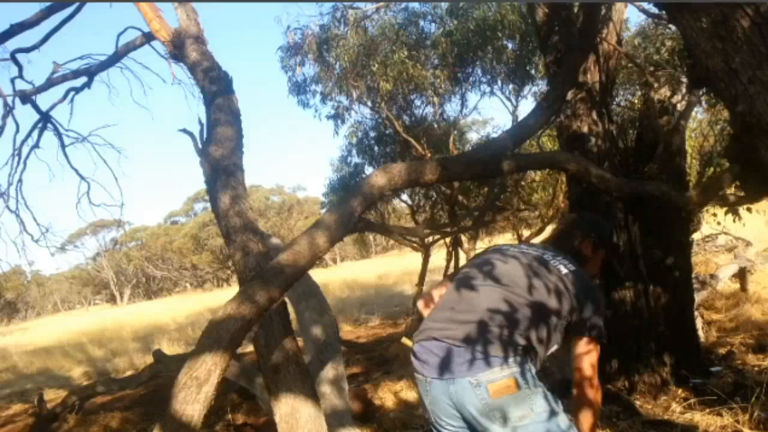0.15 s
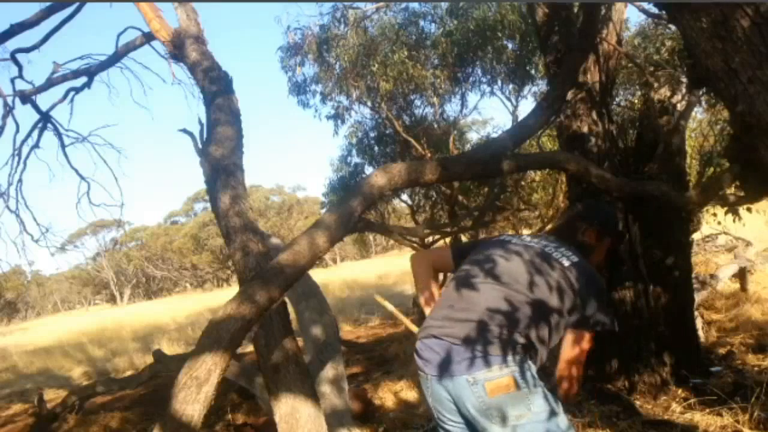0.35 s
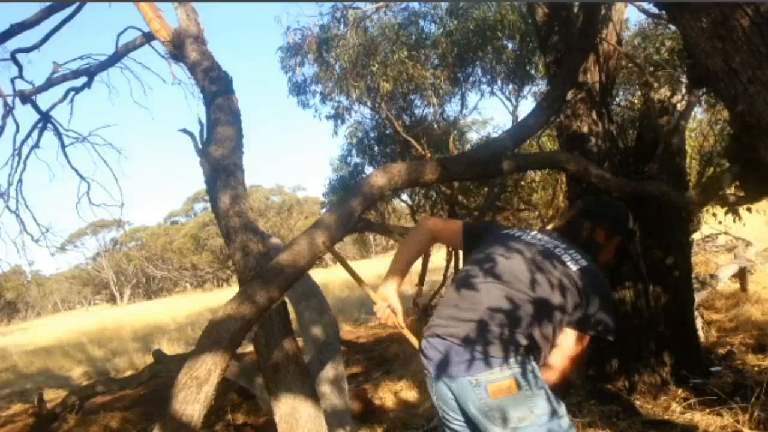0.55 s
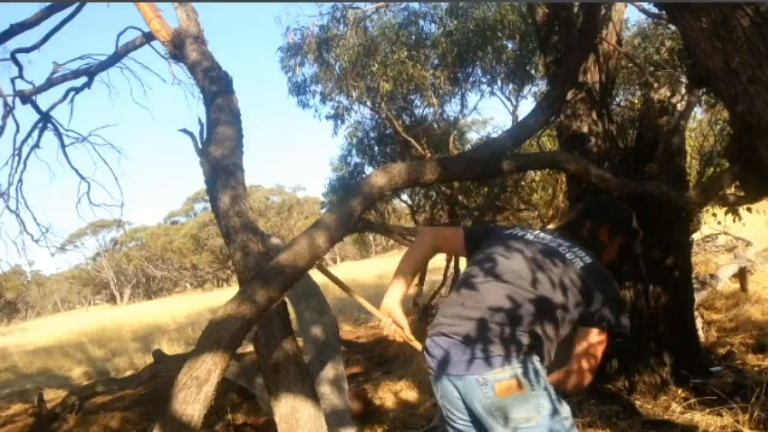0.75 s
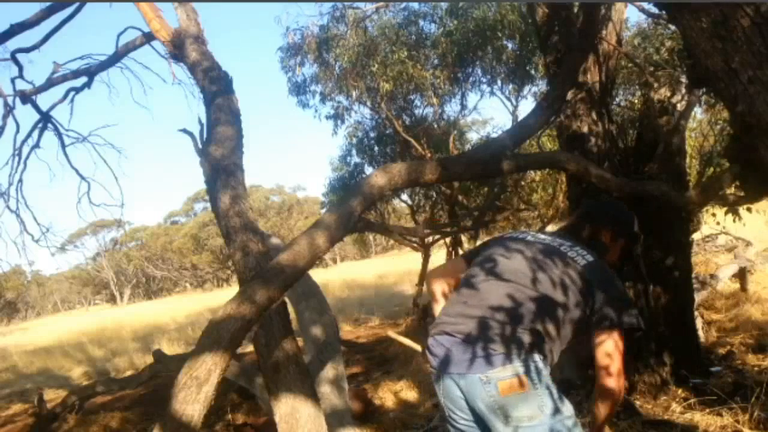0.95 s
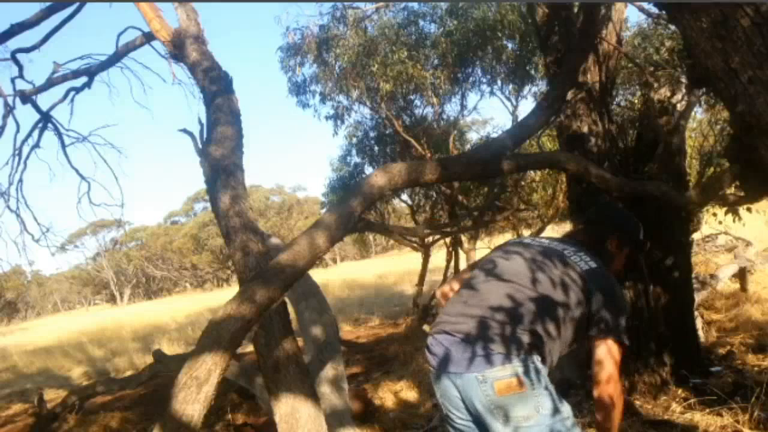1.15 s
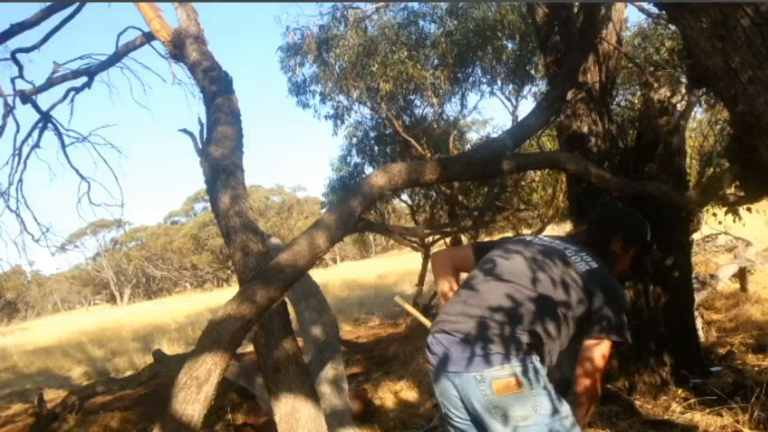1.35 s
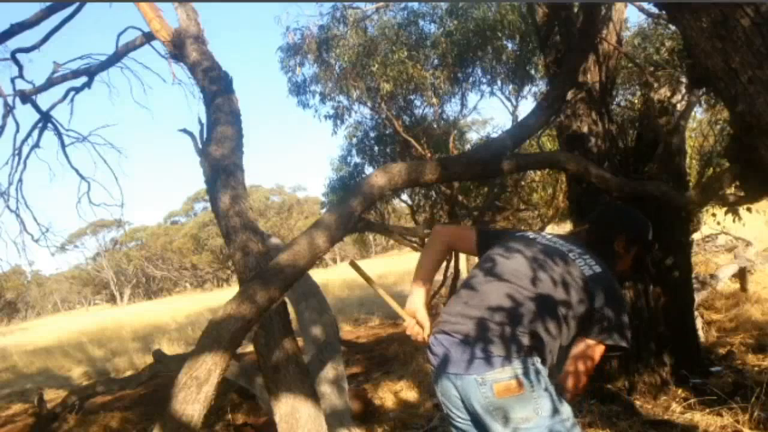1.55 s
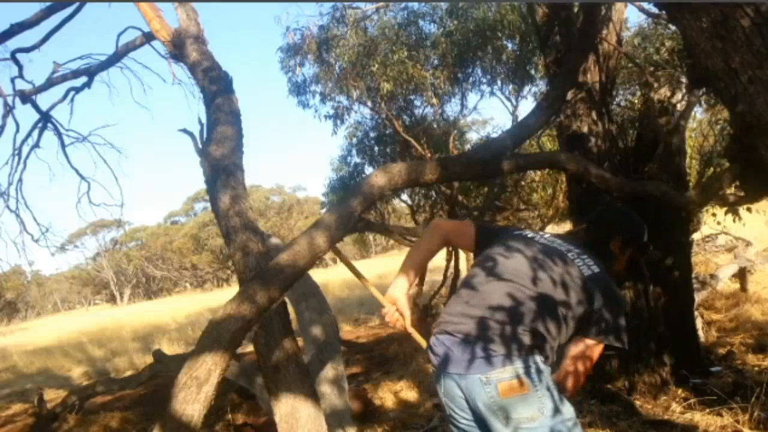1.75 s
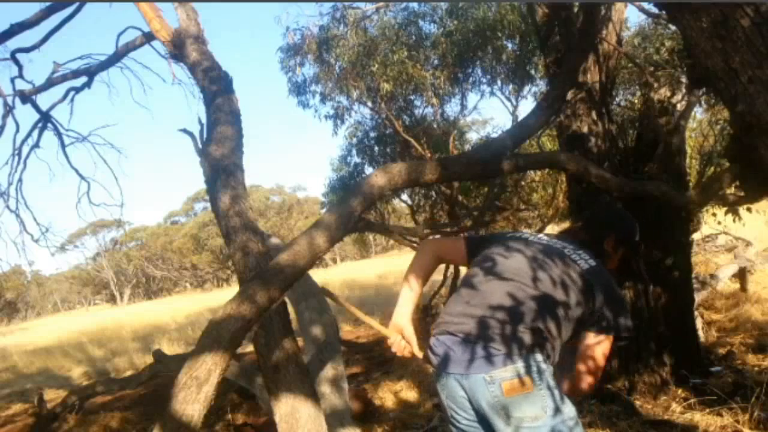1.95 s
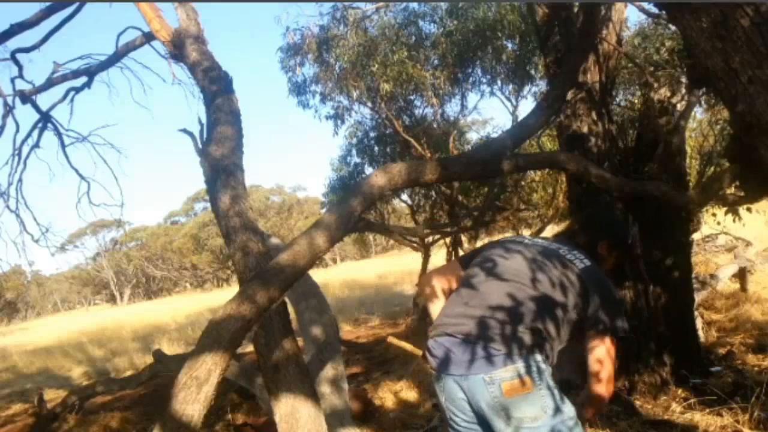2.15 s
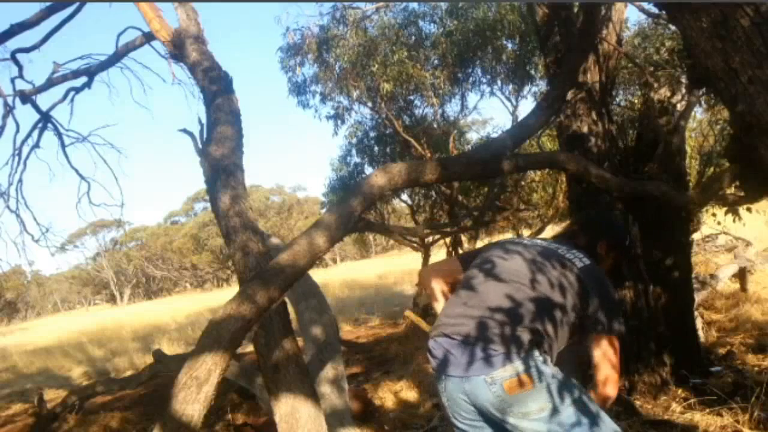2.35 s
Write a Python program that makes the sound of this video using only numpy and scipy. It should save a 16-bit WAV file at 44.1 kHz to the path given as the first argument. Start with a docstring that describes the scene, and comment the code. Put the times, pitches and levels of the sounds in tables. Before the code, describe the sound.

A rake works dry leaves and soil outdoors. Soft rustle and tiny ticks open; at about 0.27 s hard knocks land, then another clack at 0.44 s leads a gritty scrape fading by 0.75 s. Sparse twig ticks fill the lull. At 1.33-1.5 s a second stroke knocks twice, ringing briefly, with softer scraping and a faint squeak near 1.6 s, fading to quiet air and slight rustle at the end.

```python
"""Dry leaves rustle softly and grit scrapes as a long-handled rake is dragged twice through leaves and soil
outdoors. Scattered clicks make the leaves and the soil; grains ringing the rake, plus hiss, make the grit.
Small twigs and pebbles tick as short tones, and twice a dry leaf snaps high up. The rake head knocks on buried
wood and stones and rings briefly, as a set of dying tones, and squeaks now and then on gliding tones. A short
scatter follows these hits. Shaped noise makes the faint open air and a faint low noise."""
import sys
import numpy as np
from scipy import signal
from scipy.fft import rfft, irfft
from scipy.io import wavfile
from scipy.ndimage import uniform_filter1d

SR = 44100
rng = np.random.default_rng(int(sys.argv[2]) if len(sys.argv) > 2 else 0)


def elevation(decibels):
    """Turn decibel levels (scalar or array-like) into linear amplitude ratios."""
    levels = np.asarray(decibels, float)
    return 10 ** (levels / 20)


def output_pcm(signal):
    """Save a mono or channel-first signal as 16-bit PCM at the path in sys.argv[1].

    Samples are clipped to [-1, 1] before scaling.
    """
    pcm = np.clip(np.atleast_2d(signal).T, -1, 1) * 32767
    wavfile.write(sys.argv[1], SR, np.round(pcm).astype(np.int16))


N = 110250  # samples, 2.5 s

# The tones at which the rake head likes to ring. Each row: pitch in Hz.
MODE_HZ = [530, 690, 780, 880, 1175, 1350, 1450, 1585, 1700, 1950, 2075, 2460, 2660, 2880, 3330, 3770, 4850,
           5900]
# How those tones behave, in the same order; knocks and grit each adapt these values.
# Each row: basic strength in dB, basic time to fade by 60 dB in seconds.
MODE_RING = [(-1.5, 0.063), (3.5, 0.03), (6.5, 0.021), (-3.5, 0.019), (-10.5, 0.11), (-8, 0.062),
             (15, 0.023), (8, 0.053), (15.5, 0.019), (2, 0.038), (-0.5, 0.076), (5.5, 0.034), (-1.5, 0.055),
             (-0.5, 0.065), (3.5, 0.082), (7, 0.026), (11, 0.021), (13.5, 0.0059)]


def evened(x):
    """Scales a sound to an rms of 1."""
    return x / np.sqrt(np.mean(x ** 2) + 1e-20)


def add(mix, s, sound):
    """Mixes a sound in at time s, in seconds."""
    part = mix[round(s * SR):][:len(sound)]
    part += sound[:len(part)]


def colour(x, points):
    """Reshapes the balance of pitches in x to (Hz, dB) points, with -70 dB outside them, at rms 1."""
    hz, db = np.transpose(points)
    f = np.fft.rfftfreq(len(x), 1 / SR) + 1  # the 1 avoids log(0)
    gain = elevation(np.interp(np.log(f), np.log(hz), db, -70, -70))
    return evened(irfft(rfft(x) * gain, len(x)))


def clicks(per_s, spread_db):
    """Sparse single-sample clicks of random sign; a few are large."""
    present = rng.random(N) < per_s / SR
    sign = rng.choice([-1., 1.], N)
    size = elevation(spread_db * np.minimum(rng.exponential(1, N), 4))
    return present * sign * size


def level(column):
    """Loudness along the drag for one of its three materials."""
    # How strongly the rake stirs each material, before the low cut.
    # Each row: time in seconds, grit on the tines in dB, leaf rustle in dB, soil in dB.
    drag = np.array([(0, -51, -48.5, -63), (.12, -51, -44, -52.5), (.19, -50, -49.5, -54.5),
                     (.21, -54, -49, -59), (0.225, -36, -36, -44), (0.256, -38, -32.5, -40),
                     (0.289, -36.5, -43, -31), (0.338, -47.5, -50.5, -52.5), (0.393, -54, -50, -51),
                     (0.417, -34, -47, -35.5), (.455, -26, -37, -49), (.49, -31, -36.5, -47),
                     (.56, -33.5, -34.5, -43.5), (.66, -39.5, -37.5, -46), (0.719, -41.5, -44, -52.5),
                     (.77, -49.5, -51.5, -55.5), (.93, -50, -51, -57.5), (.97, -50.5, -47, -58),
                     (1.13, -48, -45, -56.5), (1.2, -57.5, -52, -58.5), (1.26, -47.5, -48.5, -58),
                     (1.315, -56, -56, -56), (1.325, -46, -47, -40), (1.338, -40, -46, -91),
                     (1.363, -39, -39.5, -35), (1.42, -41, -42.5, -47.5), (1.46, -43.5, -43, -46),
                     (1.5, -41, -42, -43.5), (1.568, -44, -47, -54), (1.69, -42.5, -40, -51),
                     (1.77, -47, -47, -56), (1.87, -46.5, -50.5, -59), (1.92, -55, -56.5, -63),
                     (2.1, -57, -64.5, -55), (2.2, -60.5, -66.5, -64.5), (2.443, -58.5, -55, -60.5),
                     (2.5, -44.5, -40.5, -53)])
    return elevation(np.interp(np.arange(N) / SR, drag[:, 0], drag[:, column]))


def ring(hz, db, t60):
    """One tone that dies by 60 dB in t60 seconds, with a soft start."""
    TOUCH_S = .00015  # time constant of the soft start
    t = np.arange(6000) / SR
    fade = elevation(db - 60 * t / t60)
    return fade * np.sin(2 * np.pi * hz * t) * (1 - np.exp(-t / TOUCH_S))


def leaves():
    """Dense fine crackle of dry leaves: many tiny clicks, heard in the treble."""
    # Tone of the leaf crackle. Each row: frequency in Hz, strength in dB per Hz.
    leaf_tone = [(1500, -2.5), (4000, 0), (6000, -9.5), (7500, -5.5), (10000, -4), (13000, -3.5),
                 (14600, -7), (14900, -67)]
    return level(column=2) * colour(clicks(per_s=5000, spread_db=2.5), leaf_tone)


def grit():
    """Grains of soil each strike one dying rake tone, over a sandy hiss; both come in lumps."""
    LOW_HZ, LOW_DB = 1000, -9  # rake tones under LOW_HZ are weakened by LOW_DB
    RING_SHARE = .33  # share of the basic fade time
    HISS_DB, LUMP_DB = -2, 1.8  # hiss against the ringing; rms swing of the lumps
    # Tone of the sandy hiss. Each row: frequency in Hz, strength in dB per Hz.
    sand_tone = [(120, -59), (200, -27), (258, -35.5), (630, -2.5), (774, -23), (1690, -0.5), (2600, -1),
                 (2810, 0), (5410, -7.5), (9000, -37), (11700, -48), (19800, -120)]
    hits = clicks(per_s=4500, spread_db=3.2)
    mode = rng.integers(0, len(MODE_RING), N)  # which tone each grain strikes
    rung = np.zeros(N)
    for k, (hz, (db, t60)) in enumerate(zip(MODE_HZ, MODE_RING)):
        tone = ring(hz, db / 2 + LOW_DB * (hz < LOW_HZ), t60 * RING_SHARE)
        rung += signal.oaconvolve(hits * (mode == k), tone)[:N]
    drift = uniform_filter1d(uniform_filter1d(rng.standard_normal(N), size=250), size=250)
    lumps = elevation(LUMP_DB * evened(drift))
    hiss = elevation(HISS_DB) * colour(rng.standard_normal(N), sand_tone)
    return level(column=1) * evened(lumps) * evened(evened(rung) + hiss)


def soil():
    """Dull lumps of earth shifting: clicks with most of their strength low down."""
    # Tone of the soil. Each row: frequency in Hz, strength in dB per Hz.
    soil_tone = [(60, -47), (150, -13), (280, 7.5), (500, 0), (900, 1.5), (1400, -5.5)]
    return level(column=3) * colour(clicks(per_s=2000, spread_db=2.5), soil_tone)


def open_air():
    """Steady, faint outdoor background of shaped noise."""
    # Tone of the open air. Each row: frequency in Hz, strength in dB per Hz.
    air_tone = [(150, -24), (300, 1), (630, 1), (1700, -27), (3500, -41), (6200, -9.5), (9000, -3),
                (14600, -3), (14900, -73)]
    return elevation(-62) * colour(rng.standard_normal(N), air_tone)


def low_noise():
    """Faint low noise on a moving level."""
    # Loudness of the low noise. Each row: time in seconds, level in dB.
    low_level = [(0.0, -71.5), (0.22, -69.5), (0.28, -49.5), (0.35, -75), (0.46, -53), (0.49, -80),
                 (0.51, -57), (0.66, -91), (0.81, -68), (1.07, -70.5), (1.09, -79), (1.49, -52.5),
                 (1.59, -78), (1.89, -67.5), (2.43, -67.5), (2.5, -73)]
    # Tone of the low noise. Each row: frequency in Hz, strength in dB per Hz.
    low_tone = [(20, -12), (60, -16.5), (130, -11), (210, -5.5), (300, -5)]
    s, db = np.transpose(low_level)
    return elevation(np.interp(np.arange(N) / SR, s, db)) * colour(rng.standard_normal(N), low_tone)


def ticks():
    """Twigs and pebbles tick, and twice a dry leaf snaps high in the treble: two short dying tones and a dry
    snap at the start."""
    # The ticks; rows close in time build one broader click.
    # Each row: start in seconds, level of the main tone in dB, its pitch in Hz, its 60 dB fade in seconds.
    tick_rows = [(.095, -39, 2470, .012), (.116, -27.5, 2600, 0.0042), (0.128, -36, 2760, 0.031),
                 (.159, -28, 2060, 0.0059), (.7958, -32, 2430, 0.0085), (.8315, -36, 3270, 0.0022),
                 (.8315, -31, 770, 0.0069), (.832, -31.5, 368, 0.02), (.877, -39, 880, 0.017),
                 (.881, -37.5, 350, 0.026), (0.899, -42, 2500, 0.04), (0.916, -38, 3320, 0.016),
                 (0.967, -21.5, 9900, 0.0014), (1.251, -37, 2930, 0.0096), (1.262, -23.5, 2700, 0.0029),
                 (1.284, -41, 2120, 0.011), (1.41, -15, 10400, 0.0017), (1.506, -41, 1580, 0.0098),
                 (1.636, -32.5, 3270, 0.027), (1.65, -38, 1860, 0.022), (1.686, -32, 3100, 0.025),
                 (1.695, -30.5, 625, 0.024), (1.711, -37, 1854, 0.1), (1.968, -49, 2560, 0.13),
                 (2.053, -48, 653, 0.086), (2.097, -36.5, 1540, 0.0048), (2.285, -47, 3660, 0.014),
                 (2.372, -43, 1740, 0.014), (2.405, -38.5, 3500, 0.011)]
    hits = np.zeros(N)
    for s, db, hz, t60 in tick_rows:
        overtone = ring(hz * 1.45, db - 12, t60 * .7)
        snap = ring(2500, db - 2, .0015)
        add(hits, s, ring(hz, db, t60) + overtone + snap)
    return hits


def knock(level_db, favour_hz, share, crack_db, noise):
    """A short chatter of contact excites the rake tones near the favoured pitch, with a dry crack."""
    FAVOUR_DB_PER_OCT = -19  # loss for each octave away from the favoured pitch
    CHATTER_S, CHATTER = .003, .045  # fade time constant; strength against the first touch
    CRACK_S = .002  # time at which the crack's swell peaks
    t = np.arange(len(noise)) / SR
    body = 0
    for k, (hz, (db, t60)) in enumerate(zip(MODE_HZ, MODE_RING)):
        octaves = abs(np.log2(hz / favour_hz))
        body = body + (-1) ** k * ring(hz, db + FAVOUR_DB_PER_OCT * octaves, t60 * share)
    contact = noise * np.exp(-t / CHATTER_S) * CHATTER
    contact[0] = 1  # the first touch
    sound = signal.oaconvolve(body / abs(body).max(), contact / np.linalg.norm(contact))[:len(body)]
    crack_swell = np.e * t / CRACK_S * np.exp(-t / CRACK_S)
    sound[:len(t)] += elevation(crack_db) * uniform_filter1d(noise[::-1], size=4) * crack_swell
    return elevation(level_db) * sound


def knocks():
    """The rake head knocks on buried wood and stones; every row has its own contact noise."""
    # The knocks: blows, their bounces and extra rings; several rows may build one blow.
    # Each row: start in seconds, overall level in dB, favoured pitch in Hz,
    # share of the basic fade time (a plain factor), crack in dB against the overall level.
    knock_rows = [(.2255, -39, 1510, 0.46, -21), (.2605, -14, 2530, 0.49, -24),
                  (0.2719, -4, 3620, 0.56, -10.5), (.2755, -8, 800, 0.48, -29),
                  (0.2863, -16.5, 742, 0.46, -32), (.2855, -16.5, 3300, 0.36, -30),
                  (0.2928, -15.5, 1780, 0.24, -39), (0.3213, -37, 820, 0.67, -28),
                  (0.4159, -28.5, 3150, 0.48, -31), (.416, -28, 690, 0.49, -42), (.438, -19, 834, 0.44, -7),
                  (0.4418, -10, 2130, 0.17, -46), (.4435, -16, 1400, 1.4, -37),
                  (0.452, -18, 3750, 0.52, -27), (0.499, -20, 1900, 0.6, -30),
                  (1.3277, -25, 3040, 0.37, -16), (1.336, -28.5, 1820, 0.31, -42.5),
                  (1.35, -26, 3500, 0.53, -35), (1.359, -25, 1500, 0.46, -33),
                  (1.3675, -6.5, 3320, 0.45, -22), (1.3685, -13, 1900, 0.69, -40),
                  (1.371, -14.5, 1480, 1.9, -43), (1.371, -24.5, 500, 3.8, -50),
                  (1.432, -27, 3700, 1.3, -30), (1.4385, -22, 3750, 0.94, -33),
                  (1.439, -28, 1600, 0.92, -26), (1.4695, -5.5, 3240, 0.71, -11),
                  (1.4705, -10, 1650, 1.6, -24), (1.475, -14.5, 2700, 1.2, -42),
                  (1.471, -18.5, 598, 0.84, -38), (1.4845, -20.5, 673, 0.22, -39),
                  (1.492, -23, 760, 0.26, -40), (1.7807, -27.5, 2690, 0.51, -33)]
    hits = np.zeros(N)
    for (s, *row), noise in zip(knock_rows, rng.standard_normal((len(knock_rows), 1500))):
        add(hits, s, knock(*row, noise))
    return hits


def squeak(length, hz, glide, db, second_db, lean, noise):
    """Regular slips: a soft swell of three partials on a gliding or steady, slightly wavering pitch."""
    WAVER, THIRD_DB = .008, -15  # rms share of the pitch; third partial against the first
    ROUGH_DB, SWELL_POWER = 2.5, 1.8  # rms flutter of the level; sharpness of the swell
    t = np.arange(0, length, 1 / SR)
    waver = evened(uniform_filter1d(noise, 300))[:len(t)]
    pitch = hz * (1 + glide * (t / length - .5) + WAVER * waver)
    turn = 2 * np.pi * np.cumsum(pitch) / SR
    swell = np.sin(np.pi * (t / length) ** lean)
    upper = elevation(second_db) * np.sin(2 * turn) + elevation(THIRD_DB) * np.sin(3 * turn)
    tone = np.sin(turn) + swell ** 2 * upper  # the upper partials swell more sharply
    rough = elevation(ROUGH_DB * evened(uniform_filter1d(noise[::-1], size=120))[:len(t)])
    return np.sqrt(2) * elevation(db) * swell ** SWELL_POWER * rough * tone


def squeaks():
    """The rake head squeaks now and then by sticking and slipping."""
    # The squeaks. Each row: start in seconds, length in seconds, middle pitch in Hz,
    # upward glide as a share of the pitch, level in dB before swell and flutter,
    # second partial in dB against the first, lean as a plain power (under 1 peaks early).
    squeak_rows = [(0.477, 0.036, 1770, -0.02, -36, 8, .45), (.624, .032, 2880, 0, -38, -30, .8),
                   (.889, .011, 2720, -.05, -38, -30, 1.2), (1.57, 0.082, 565, 0.06, -35.5, -7, .9),
                   (1.704, 0.04, 575, 0.09, -46, 1, .7)]
    hits = np.zeros(N)
    for (s, *row), noise in zip(squeak_rows, rng.standard_normal((len(squeak_rows), 5000))):
        add(hits, s, squeak(*row, noise))
    return hits


def scatter(hits):
    """Short scatter from ground and trunks: the hits smeared by a dying burst of noise."""
    ECHO_DB, ECHO_T60_S, ECHO_HZ = -15.5, .033, 3500  # level; 60 dB fade; start of the treble loss
    t = np.arange(8000) / SR
    noise = colour(rng.standard_normal(len(t)), [(300, 0), (ECHO_HZ, 0), (9000, -20)])
    tail = noise * elevation(-60 * t / ECHO_T60_S) * (t > .003)  # silent for the first 3 ms
    return elevation(ECHO_DB) * signal.oaconvolve(hits, tail / np.linalg.norm(tail))[:N]


def scene():
    """The drag, the hits and their scatter, thinned in the bass, plus open air and low noise."""
    hits = ticks() + knocks() + squeaks()
    rake = leaves() + grit() + soil() + hits + scatter(hits)
    # the microphone's low-cut thins the bass below 360 Hz
    low_cut = signal.butter(4, 360, "high", fs=SR, output="sos")
    thin = signal.sosfilt(low_cut, rake)
    return (thin + open_air() + low_noise())[None]


def top_cut(x):
    """Nothing passes above the cut-off."""
    return signal.sosfilt(signal.butter(12, 15770, fs=SR, output="sos"), x)


def record(dry):
    """Takes off the treble above 15 kHz and finishes the mix."""
    low_pass = signal.firwin(255, 15000, window=("kaiser", 7), fs=SR)
    edged = signal.oaconvolve(dry, low_pass[None], "same")
    return top_cut(edged)


dry = scene()
out = record(dry)
output_pcm(out)
```